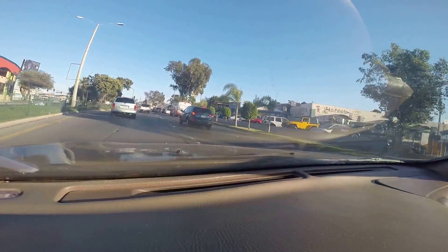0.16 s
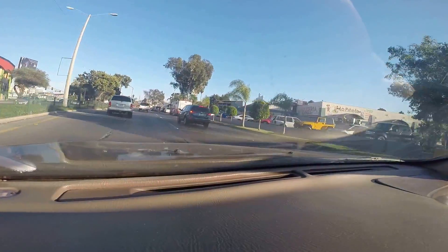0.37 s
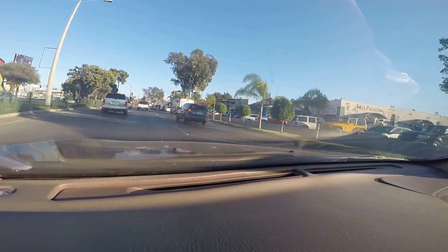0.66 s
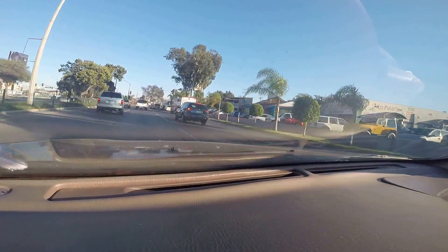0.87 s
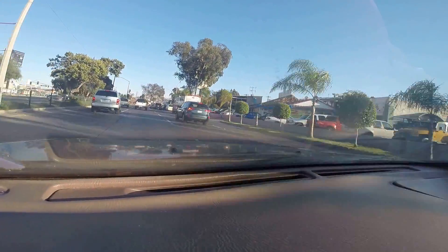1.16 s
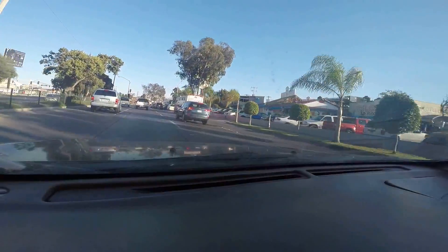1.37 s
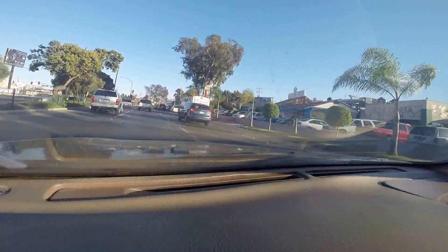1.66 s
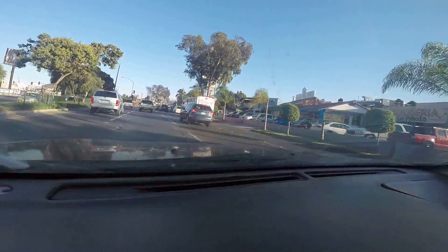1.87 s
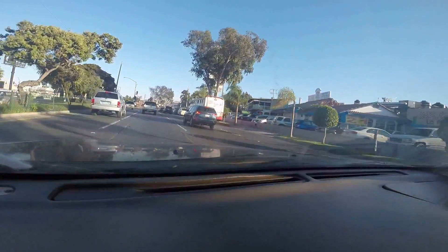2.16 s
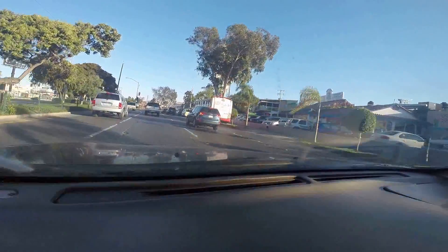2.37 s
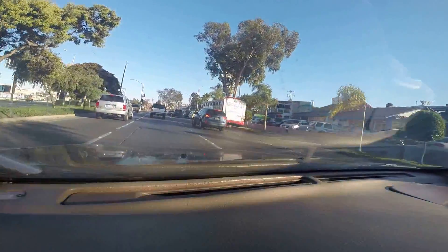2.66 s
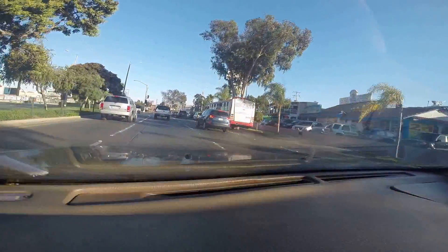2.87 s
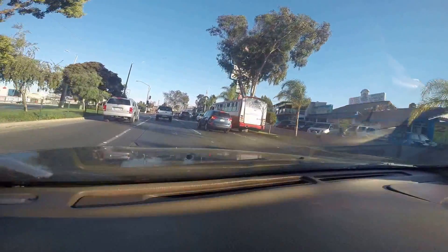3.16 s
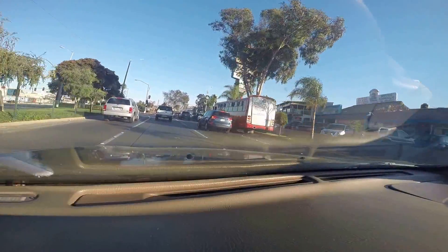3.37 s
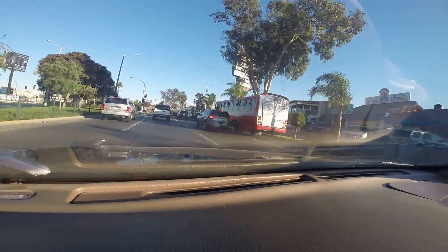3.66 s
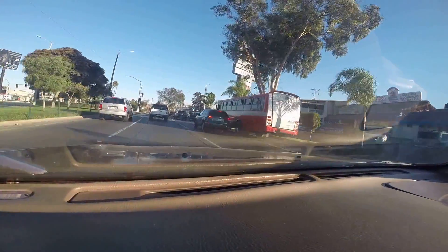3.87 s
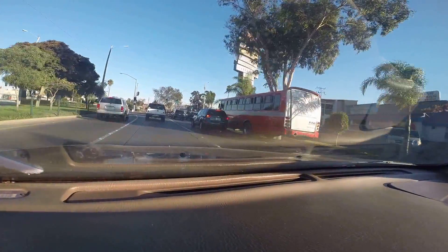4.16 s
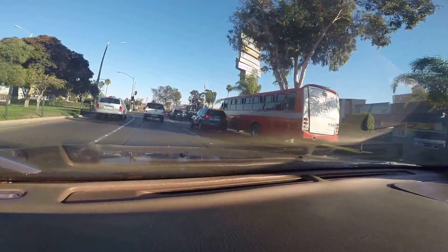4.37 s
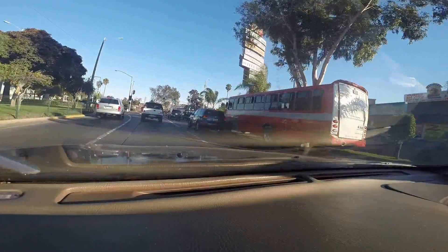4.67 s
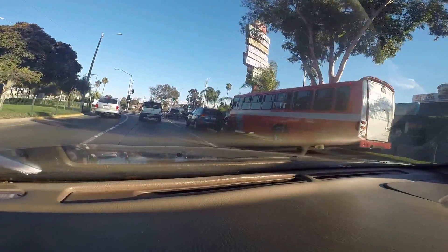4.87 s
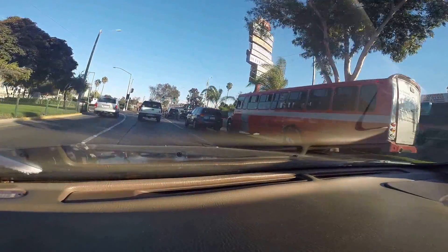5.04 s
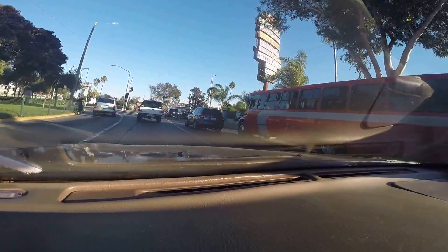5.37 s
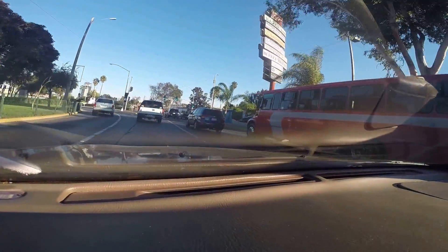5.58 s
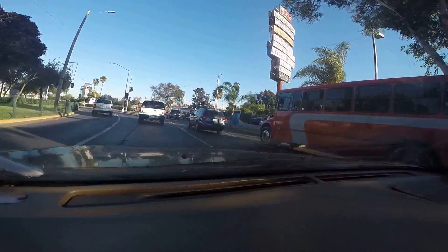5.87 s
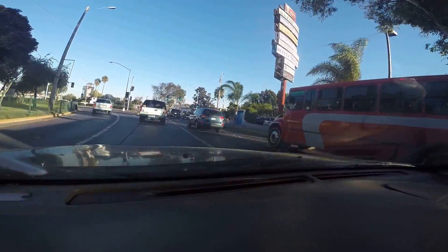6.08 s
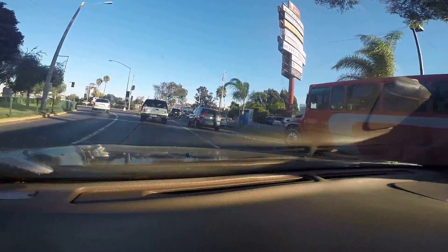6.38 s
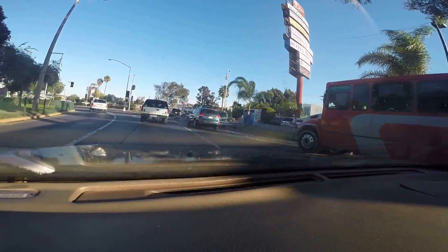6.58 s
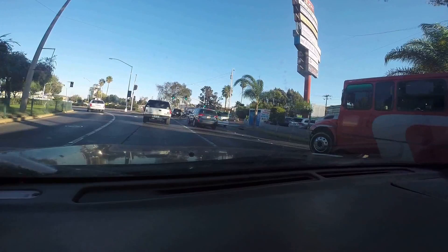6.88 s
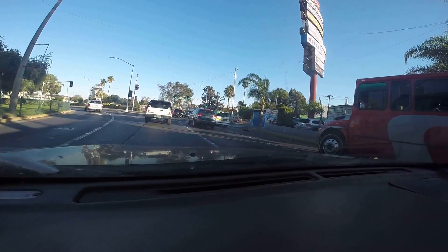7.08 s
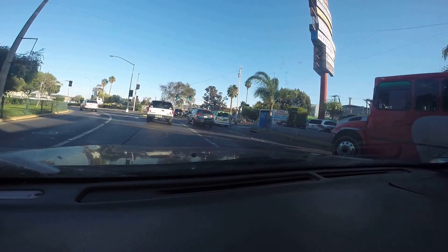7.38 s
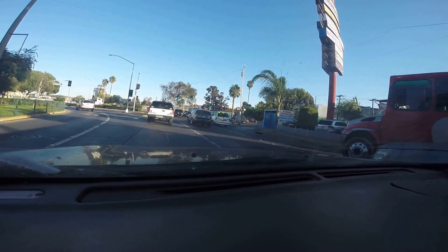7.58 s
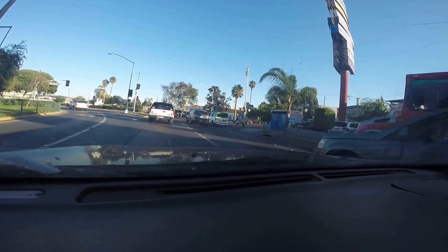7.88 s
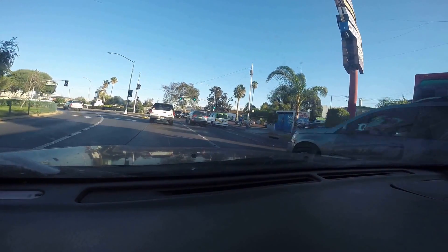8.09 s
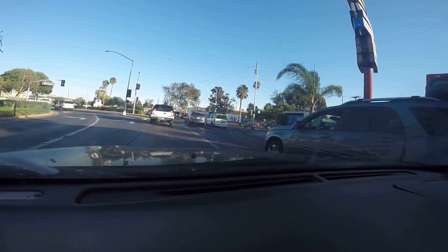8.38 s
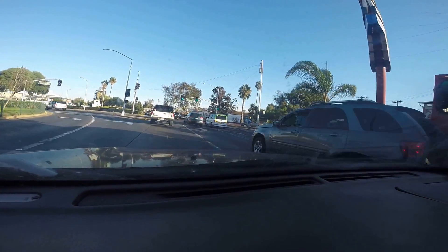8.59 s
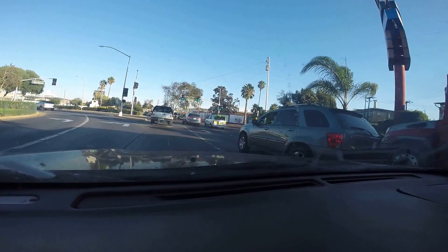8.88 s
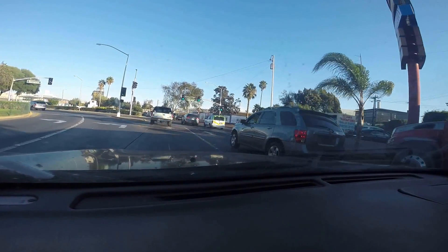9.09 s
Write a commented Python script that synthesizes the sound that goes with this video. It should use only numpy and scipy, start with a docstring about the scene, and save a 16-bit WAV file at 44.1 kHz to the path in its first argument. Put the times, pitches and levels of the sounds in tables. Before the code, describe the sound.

Low cabin rumble and thumping boom of a slowing car, with a constant crisp plastic rattle on the dashboard and traffic hiss growing at the end.

```python
"""Car slowing through city streets

Heard from a small camera in a plastic housing on the dashboard: a mount shaking near 20 Hz, cabin boom,
engine and road rumble made from wavering tones and shaped noise; ticks of a loose part and knocks of the
trim made from dying modes; low thuds and higher rasps made from short grainy noise. Behind them is hiss,
from cabin air, traffic coloured by the housing, and a vehicle alongside that grows loud towards the end."""
import sys
import numpy as np
from scipy import signal
from scipy.fft import rfft, irfft
from scipy.io import wavfile

SR = 44100
rng = np.random.default_rng(int(sys.argv[2]) if len(sys.argv) > 2 else 0)


def put_to_file(sound):
    """Save the sound as 16-bit audio at rate SR, in the file named by the first command-line argument."""
    columns = np.atleast_2d(sound).T  # one column per channel
    safe = np.clip(columns, -1, 1)
    whole_steps = np.round(safe * 32767)
    wavfile.write(sys.argv[1], SR, whole_steps.astype(np.int16))


N = 406602  # samples, about 9.22 s


def amp(db):
    """Turns dB into gain."""
    return 10 ** (np.asarray(db) / 20)


def evened(x):
    """Scales a sound to rms 1."""
    return x / np.sqrt(np.mean(x ** 2) + 1e-20)


def clock():
    """The time of every sample, in seconds."""
    return np.arange(N) / SR


def curves(rows):
    """Draws straight lines between table rows, giving each column after the time at every sample."""
    s, *columns = np.transpose(rows)
    return [np.interp(clock(), s, c) for c in columns]


def read(points, hz):
    """Reads a spectrum at any pitch, along a log-frequency axis."""
    f, value = np.transpose(points)
    return np.interp(np.log(hz + 1), np.log(f + 1), value)


def add(mix, s, sound):
    """Lays a sound into the mix at s seconds, cutting whatever falls outside."""
    at = round(s * SR)
    part = mix[max(at, 0):][:len(sound) + min(at, 0)]
    part += sound[max(-at, 0):][:len(part)]


def drift(hz):
    """Slow chance of rms 1: noise with everything faster than about hz smoothed away."""
    smoother = signal.butter(2, hz, fs=SR, output="sos")
    settled = signal.sosfilt(smoother, rng.standard_normal(N + SR))[SR:]
    return evened(settled)


def noise(spectrum, modes=()):
    """Steady noise of rms 1 with a given spectrum, lifted or cut around each resonance."""
    hz = np.fft.rfftfreq(N, 1 / SR)
    db = read(spectrum, hz)
    for f, width, lift_db in modes:
        db = db + lift_db / (1 + (2 * (hz - f) / width) ** 2)
    return evened(irfft(rfft(rng.standard_normal(N)) * amp(db), N))


def tone(hz, level_db, waver, waver_hz):
    """A low sine at an rms level, its pitch wandering by the share waver."""
    turns = np.cumsum(hz * (1 + waver * drift(waver_hz))) / SR
    return np.sqrt(2) * amp(level_db) * np.sin(2 * np.pi * (turns + rng.random()))


def resonate(x, hz, width):
    """A resonance: shifts the pitch hz down to zero, smooths, and shifts back."""
    turn = np.exp(2j * np.pi * np.cumsum(hz * np.ones(len(x))) / SR)
    r = np.exp(-np.pi * width / SR)
    smooth = signal.lfilter([1 - r], [1, -r], x / turn)
    return 2 * (turn * smooth).real


def swell(s, db, hold, rise_db, fall_db):
    """Level in dB of an event that rises to s, holds and falls, at rates in dB per second."""
    t = clock()
    return db - rise_db * np.maximum(s - t, 0) - fall_db * np.maximum(t - s - hold, 0)


def joined(levels_db):
    """Adds levels in dB as powers."""
    return 10 * np.log10(sum(amp(db) ** 2 for db in levels_db))


# jolts that set the mount swinging; start_s is when the swing becomes widest
# columns: start_s, level_db, hold_s
JOLT_TABLE = [(0.14, -28, 0.03), (0.532, -22.5, 0.034), (0.78, -27.5, 0.018), (0.993, -27, 0.058),
              (1.195, -20, 0.022), (1.525, -16.5, 0.043), (2.286, -34, 0.14), (2.618, -29, 0.17),
              (3.11, -33.5, 0.21), (3.63, -29.5, 0.027), (3.93, -26, 0.0081), (4.382, -21, 0.018),
              (5.163, -17, 0.098), (5.879, -21.5, 0.046), (6.343, -32.5, 0.018), (6.75, -30.5, 0.037),
              (7.806, -36, 0.041), (8.036, -34, 0.25), (8.6, -32, .02), (9.04, -39, 0.046)]
CALM_SHAKE_DB, CALM_FADE_DB_PER_S = -34.5, 0.2  # the mount between jolts
SHAKE_RISE_DB_PER_S, SHAKE_FALL_DB_PER_S = 139, 71


def shake_level():
    """The mount trembles less as the car slows, and swings wide at each jolt."""
    calm_db = CALM_SHAKE_DB - CALM_FADE_DB_PER_S * clock()
    jolts_db = [swell(*row, SHAKE_RISE_DB_PER_S, SHAKE_FALL_DB_PER_S) for row in JOLT_TABLE]
    return joined([calm_db] + jolts_db)


SHAKE_START_HZ, SHAKE_SAG_HZ_PER_S = 19.6, 0.08
SHAKE_LOPSIDED = 1.4  # how much harder wide swings hit on one side


def mount_shake(shake_db):
    """The mount swings as a wavering low tone; its squared part makes wide swings lopsided."""
    hz = SHAKE_START_HZ - SHAKE_SAG_HZ_PER_S * clock()
    swing = tone(hz, shake_db, 0.055, 4)
    return swing + SHAKE_LOPSIDED * (swing ** 2 - amp(shake_db) ** 2)


# cabin boom between kicks; columns: start_s, level_db
BOOM_LEVELS = [(0, -33), (.59, -23.5), (1.2, -26), (1.36, -38.5), (1.9, -34.5), (2.7, -32), (3.2, -37.5),
               (3.8, -33), (4.4, -35.5), (4.6, -43.5), (5.3, -35), (6.4, -42), (7.4, -42.5), (7.75, -38),
               (8.4, -39.5), (8.8, -36), (9.22, -36.5)]
BOOM_HZ, BOOM_START_SAG_HZ, BOOM_SETTLE_S = 62.55, 8.8, 0.303
BOOM_LOUD_DB, BOOM_FAINT_DB = -26.5, -32.5
WAVER_LOUD, WAVER_FAINT = 0.015, 0.08995  # pitch wander as a share; a faint boom wanders more


def cabin_boom():
    """The cabin hums as one low tone, starting flat and settling up to its pitch."""
    boom_db, = curves(BOOM_LEVELS)
    waver = np.interp(boom_db, (BOOM_FAINT_DB, BOOM_LOUD_DB), (WAVER_FAINT, WAVER_LOUD))
    hz = BOOM_HZ - BOOM_START_SAG_HZ * np.exp(-clock() / BOOM_SETTLE_S)
    return tone(hz, boom_db, waver, 5.515)


# kicks that ring the cabin, each at its own pitch; start_s is the loudest moment
# columns: start_s, level_db, pitch_hz
KICK_TABLE = [(0.131, -32, 51.5), (.13, -32, 33.3), (1.173, -23, 59.4), (1.176, -23.5, 42),
              (1.71, -23.5, 65.6), (1.839, -26.5, 75), (1.5, -32, 41.5), (2.9, -37, 73), (2.051, -30, 59.4),
              (2.289, -26.5, 58.8), (2.66, -30, 73), (3.129, -33, 65.3), (3.369, -33.5, 68.7),
              (3.67, -31.5, 65.8), (3.93, -26.5, 56.6), (4.16, -29.5, 75.2), (4.39, -41, 58),
              (4.74, -28, 66), (5., -30, 81.4), (4.749, -33.5, 80.5), (5.149, -29.5, 55.7),
              (5.35, -31.5, 82.7), (5.42, -30, 61.7), (5.72, -31, 82.5), (8.33, -37.5, 97), (8.35, -35, 43),
              (5.689, -27.5, 72.3), (5.873, -34, 62), (6.179, -34.5, 74.5), (6.798, -28, 74.5),
              (7.09, -31, 59.7), (7.639, -32.5, 60.4), (8.129, -32, 58.5), (8.658, -28, 62)]
KICK_RISE_DB_PER_S, KICK_FALL_DB_PER_S = 264, 139


def cabin_kicks():
    """Each kick rings the cabin air as a sine that swells and dies quickly."""
    out = np.zeros(N)
    t = np.arange(-SR // 8, SR // 3) / SR  # zero at the loudest moment
    shape_db = -KICK_RISE_DB_PER_S * np.maximum(-t, 0) - KICK_FALL_DB_PER_S * np.maximum(t, 0)
    for (s, db, hz), start in zip(KICK_TABLE, rng.random(len(KICK_TABLE))):
        kick = np.sqrt(2) * amp(db + shape_db) * np.sin(2 * np.pi * (hz * t + start))
        add(out, s + t[0], kick)
    return out


# engine firing tone, sinking as the car coasts and rising at the very end
# columns: start_s, pitch_hz, level_db
ENGINE_CURVE = [(0, 46.66, -42), (1.2, 43.41, -39), (1.8, 39.22, -39), (2.6, 33.66, -36),
                (3.6, 29.24, -33.5), (4.4, 26.48, -36), (6, 23.99, -40.5), (7.2, 22.11, -36.5),
                (8.4, 20.83, -59), (8.9, 27, -37), (9.22, 32.3, -38)]


def engine():
    """The engine's firing is one low tone that follows the pitch and level curves."""
    return tone(*curves(ENGINE_CURVE), 0.015, 3.2)


# level of each road layer; columns: start_s, body_shudder_db, tyre_drone_db, panel_drone_db
ROAD_LEVELS = [(0, -35, -43.5, -48.5), (.6, -31, -40.5, -48), (1.2, -36, -36.5, -49),
               (1.4, -38, -40, -50.5), (2, -38, -41, -49.5), (2.77, -36, -43, -49), (3.3, -35, -41.5, -49),
               (4.2, -36.5, -43, -54), (4.9, -41.5, -44.5, -53), (5.8, -33.5, -44.5, -53),
               (6.8, -35.5, -47, -55), (7.35, -41.5, -45, -56), (7.6, -36.5, -44, -55),
               (8.37, -34.5, -48, -49.5), (8.6, -38, -45, -56), (9.22, -36, -49, -53)]
# spectrum of the body shudder; columns: pitch_hz, relative_db (per Hz)
SHUDDER_SPECTRUM = [(5, -22), (9, -16), (26, -15.5), (31, -4.5), (38, 0.5), (48, -1), (66, -2.5), (86, 0),
                    (100, -10), (115, -14), (150, -55), (250, -120)]
# spectrum of the tyre drone; columns: pitch_hz, relative_db (per Hz)
TYRE_SPECTRUM = [(62, -26), (105, -1.5), (146, 2), (195, -17.5), (250, -53), (430, -120)]
# spectrum of the panel drone; columns: pitch_hz, relative_db (per Hz)
PANEL_SPECTRUM = [(110, -35), (185, -2.5), (237, -1.5), (285, 1), (381, -24), (474, -27), (571, -24),
                  (719, -23.5), (1100, -34), (1430, -63), (2420, -120)]
# how far a joint of JOINT_DB lifts shudder, tyre and panel; other joints lift more or less
JOINT_LIFT_DB, JOINT_DB, JOINT_DB_PER_DB = (8, 6, 8), -30, 0.35
JOINT_RISE_DB_PER_S, JOINT_FALL_DB_PER_S = 76, 69
ROAD_GRAIN_DB, ROAD_GRAIN_HZ = 1, 5.15  # uneven tarmac


def road():
    """The road shakes the body, drones in the tyres and hums in the panels; tarmac and joints stir each."""
    out = np.zeros(N)
    spectra = (SHUDDER_SPECTRUM, TYRE_SPECTRUM, PANEL_SPECTRUM)
    for level_db, lift_db, spectrum in zip(curves(ROAD_LEVELS), JOINT_LIFT_DB, spectra):
        lifts = []
        for s, joint_db, _, length, *_ in BUMP_TABLE:
            top_db = lift_db + JOINT_DB_PER_DB * (joint_db - JOINT_DB)
            lifts.append(swell(s, top_db, length, JOINT_RISE_DB_PER_S, JOINT_FALL_DB_PER_S))
        joints_db = np.maximum(np.max(lifts, axis=0), 0)
        grain_db = ROAD_GRAIN_DB * drift(ROAD_GRAIN_HZ)
        out += amp(level_db + joints_db + grain_db) * noise(spectrum)
    return out


# wheels crossing joints in the road; tyre_share (0-1) splits the ring between tyre and panel
# columns: start_s, level_db (before doubling), tyre_share, length_s, tyre_pitch_hz, panel_pitch_hz
BUMP_TABLE = [(0.121, -38.5, 0.55, 0.049, 121, 263), (0.441, -44.5, 0.53, 0.074, 140, 289),
              (0.622, -38, 0.56, 0.058, 220.5, 292), (0.899, -45.5, 0.22, 0.046, 140, 282),
              (1.045, -45, 0.07, 0.045, 139, 261), (1.15, -39, 0.8, 0.053, 137, 287),
              (1.46, -38, 0.34, 0.048, 137, 287), (1.672, -27.5, 0.82, 0.069, 139.4, 286),
              (2.252, -38.5, 1, 0.065, 118.3, 218), (2.52, -37, 0.89, 0.042, 132, 289),
              (3.289, -43, 1, 0.052, 123, 282), (3.96, -41.5, 0.97, 0.058, 153, 282),
              (4.689, -32, 0.77, 0.081, 149.4, 286), (6.008, -58, 0.86, 0.071, 134, 282),
              (6.19, -44.5, 0.57, 0.065, 135, 208), (8.263, -48, 0.68, 0.1, 152, 281),
              (8.628, -47.5, 0.43, 0.079, 137, 282.5), (8.92, -38.5, 0.87, 0.055, 130, 286)]


def bumps():
    """Each joint swells the tyre's air ring and a floor panel for a few cycles."""
    out = np.zeros(N)
    starts = rng.random((len(BUMP_TABLE), 2))
    for (s, db, share, length, tyre_hz, panel_hz), (a, b) in zip(BUMP_TABLE, starts):
        t = np.arange(round(length * SR)) / SR
        tyre = share * np.sin(2 * np.pi * (tyre_hz * t + a))
        panel = (1 - share) * np.sin(2 * np.pi * (panel_hz * t + b))
        add(out, s, 2 * amp(db) * (tyre + panel) * signal.windows.tukey(len(t), 0.6))
    return out


# brief moments when the low noise happens to be weaker; middle_s is the middle of the dip
# columns: middle_s, depth_db, half_length_s
DIP_TABLE = [(1.376, 2.5, 0.023), (2.172, 2, 0.028), (2.502, 4, 0.03), (3.88, 7, 0.026),
             (5.083, 11.5, 0.023), (5.73, 15, 0.021), (6.45, 4, 0.044), (6.912, 4, 0.027),
             (7.347, 3, 0.037), (7.986, 4, .03), (8.817, 2, 0.026)]


def low_dips():
    """Gain of the low sounds, easing down and back at each brief weaker moment."""
    dip_db = np.zeros(N)
    for s, depth_db, half in DIP_TABLE:
        add(dip_db, s - half, depth_db * signal.windows.tukey(round(2 * half * SR), 0.7))
    return amp(-dip_db)


# loose part tapping the housing; middle_s is the middle of the contact
# columns: middle_s, level_db (before modes and gain), dullness_db (per octave)
TICK_TABLE = [(0.1314, -34, 1.0), (0.312, -35.0, 0.5), (0.3589, -34.5, 1), (0.3646, -36, 0),
              (0.4128, -36, 0.5), (0.4619, -33, 1), (0.4667, -36, -2), (0.5653, -35, 1.0),
              (0.5854, -47.0, -4.0), (0.6164, -38, 0.5), (0.695, -35, 0), (0.8446, -35.5, 0),
              (0.897, -38, 0.5), (0.9466, -41, 2), (1.09, -36.0, 1.0), (1.1407, -37, 1), (1.2295, -34, 0),
              (1.2369, -35.5, 0), (1.2855, -33.5, 2), (1.2885, -32.0, -2), (1.3454, -33.5, -0.5),
              (1.4423, -36, 0), (1.5026, -37.5, 0.5), (1.5564, -35, 1.0), (1.7117, -33.5, 0.5),
              (1.7218, -34, -0.5), (1.7808, -36.5, 1), (1.8511, -43, 2), (1.8863, -40, 2.0),
              (1.988, -34.0, 0.5), (1.9922, -34, 0.5), (2.0428, -31, -1), (2.045, -32.5, 0),
              (2.0981, -30.5, -0.5), (2.1003, -32, -3), (2.155, -32.0, -0.5), (2.1579, -37.5, -1),
              (2.2148, -36.0, 0.0), (2.275, -38, 3.5), (2.2813, -32.5, -2), (2.376, -37, 1.0),
              (2.4243, -36.5, 0.5), (2.5046, -48, 2), (2.5507, -38.0, -1.0), (2.564, -34.5, -3),
              (2.6217, -36.5, 0.0), (2.6723, -37.5, 0.5), (2.6823, -35.0, -2.0), (2.7238, -37, 2.5),
              (2.7353, -32.5, -3), (2.7934, -36, 1), (2.8489, -36.5, 1.5), (2.861, -34.5, -3.5),
              (2.9045, -39, -0.5), (2.966, -37, 1.5), (3.02, -35.5, 1), (3.097, -41.5, 0.0),
              (3.1442, -36.0, 2.5), (3.149, -33.5, -0.5), (3.1967, -34, 1), (3.2015, -34, -0.5),
              (3.255, -35, 0.5), (3.2645, -34.5, 0), (3.3119, -38, -2), (3.499, -43, 1),
              (3.6284, -37.5, -3.5), (3.6403, -35, -1.5), (3.6885, -32, 1), (3.6917, -31.5, -1),
              (3.7466, -32.5, -0.5), (3.752, -36, -2), (3.7992, -37, 0.5), (3.855, -37.5, 0.5),
              (3.9751, -38.5, 1.5), (4.0528, -38.0, 0.0), (4.1151, -35, 1.0), (4.1751, -35, -1),
              (4.224, -35.5, 0), (4.323, -37, 0.5), (4.4754, -37.5, -1.5), (4.5244, -36, 1),
              (4.6716, -35, 0.0), (4.7565, -34, 0.5), (4.7649, -37, -2), (4.816, -32, 0.5),
              (4.82, -35.0, -0.5), (4.8873, -37.5, 0.5), (4.963, -46, 3), (5.0895, -36.0, 0.0),
              (5.1475, -32, 1.5), (5.1501, -32, -0.5), (5.2019, -31.5, 0.5), (5.207, -35.5, -1),
              (5.2528, -31.5, 0.5), (5.256, -31.5, -4.0), (5.3115, -34.5, 1.5), (5.3153, -33.5, -0.5),
              (5.3694, -36.5, 1.5), (5.4282, -35, 2), (5.4879, -36.5, 0), (5.549, -36.5, 0),
              (5.6851, -37.5, 1), (5.8013, -38.5, 0.5), (5.9543, -36, 0), (6.009, -33.5, 0.5),
              (6.0158, -38, -2), (6.0701, -38.5, 1.5), (6.1652, -35.5, 1), (6.2169, -35.0, 0.5),
              (6.219, -43.5, -1), (6.2248, -35.5, -2), (6.2764, -37, 0.0), (6.34, -37, 0.5),
              (6.3854, -34.5, 0.5), (6.4409, -38.5, -1.0), (6.543, -34, 0), (6.5527, -37, -2),
              (6.7104, -37, 1), (6.76, -37.0, -6), (6.9158, -38, 0.5), (7.2389, -38.5, 1),
              (7.3591, -38.5, -0.5), (7.5309, -39, 0.5), (7.5774, -37, 1.5), (7.7522, -36.5, -0.5),
              (7.8666, -36.0, -2), (7.9289, -41, 2), (8.3369, -36.5, -2.5), (8.4124, -37.5, -4.0),
              (8.5367, -37, -8), (8.8038, -41.0, 2.5), (8.9559, -36.5, -2), (9.0006, -33, -2.5),
              (9.066, -38, -1), (9.1226, -38, 0), (9.1315, -37, -2), (9.1881, -37, -3)]
# what the tap rings; columns: pitch_hz, relative_db, time_to_fall_60_db_s
TICK_RINGS = [(1410, -19.5, 0.022), (1607, -9, 0.014), (2386, -8.5, 0.013), (2900, -12.5, 0.0085),
              (3360, -23, 0.0036), (4150, -13, 0.011), (4490, -17.5, 0.011), (4816, -10, 0.01),
              (5700, -18.5, 0.012), (6100, -16.5, .01), (6650, -24, 0.0081), (7450, -25.5, 0.016),
              (8370, -7.5, 0.0085), (9000, -23.5, .009), (9180, -24, 0.0085), (9680, -22.5, .009),
              (10200, -16, 0.007), (10800, -20.5, 0.0088), (11400, -24.5, .007), (12240, -23, 0.0065),
              (12950, -26, .006), (13700, -27, 0.0045)]
TICK_CONTACT_S, TICK_GAIN_DB = 0.001, 1.5
TICK_VARY_DB, TICK_DETUNE = 1, 0.0062  # chance in each mode's level and pitch (a share)
TICK_LAG_RAD = 0.35  # how far modes start out of step


def ticks():
    """Nearly the same tap each time: modes ring after a short contact, and a dull tap favours low ones."""
    hz, mode_db, t60 = np.transpose(TICK_RINGS)[:, :, None]
    t = np.arange(700) / SR
    sign = (-1.) ** np.arange(len(hz))[:, None]  # neighbouring modes push opposite ways
    onset = np.sin(np.pi / 2 * np.minimum(t / TICK_CONTACT_S, 1)) ** 2
    out = np.zeros(N)
    chance = rng.standard_normal((len(TICK_TABLE), 3, len(hz), 1))
    for (s, db, dull_db), (vary, detune, lag) in zip(TICK_TABLE, chance):
        tilt_db = dull_db * np.log2(8400 / hz)  # no tilt at 8400 Hz
        rings = amp(db + mode_db + tilt_db + TICK_VARY_DB * vary - 60 * t / t60)
        pitch = hz * (1 + TICK_DETUNE * detune)
        tap = sign * rings * np.sin(2 * np.pi * pitch * t + TICK_LAG_RAD * lag)
        add(out, s - TICK_CONTACT_S / 2, onset * tap.sum(0))
    return amp(TICK_GAIN_DB) * out


def ring(hz, t60, rise_cycles, size=1600):
    """One mode dying away; it takes a few cycles to build, so low modes come in late."""
    t = np.arange(size) / SR
    build = (1 - np.exp(-t * hz / rise_cycles)) ** 2
    return amp(-60 * t / t60) * build * np.sin(2 * np.pi * hz * t)


# what the trim rings; columns: pitch_hz, relative_db
TRIM_RINGS = [(520, -6), (720, 23), (950, 13.5), (1340, 11.5), (1580, 11), (1900, -4), (2360, 7.5),
              (2750, 2), (3150, 1), (3600, -1.5), (3950, -2), (4300, -0.5), (6000, -9.5), (6500, -4.5),
              (7300, -13)]


def knock(hz, narrow_db, t60, detune):
    """A blow rings the trim modes, favouring those near hz; its peak is 1."""
    blow = 0
    for (f, db), d in zip(TRIM_RINGS, detune):
        near_db = db - narrow_db * abs(np.log2(f / hz))
        blow = blow + amp(near_db) * ring(f * d, t60, 4.3)
    return blow / abs(blow).max()


# dull knocks of the trim, some built from several rows at different pitches
# columns: start_s, level_db, favoured_pitch_hz, narrowness_db (per octave), time_to_fall_60_db_s
KNOCK_TABLE = [(.4, -45, 1360, 25, 0.012), (0.4654, -42, 1590, 23, .013), (.514, -50, 2300, 12, .008),
               (.64, -51, 1800, 10, .008), (.724, -46, 1600, 12, .01), (1.036, -50, 1320, 30, .013),
               (1.0689, -49, 1310, 25, .013), (1.1769, -47, 1440, 25, .013), (1.433, -44.5, 780, 20, .014),
               (1.435, -36, 1750, 20, 0.011), (1.448, -38, 1370, 11, .014), (1.4505, -46, 2350, 28, .022),
               (1.4555, -44, 1500, 25, .014), (1.488, -48, 1750, 25, .014), (1.478, -54, 1600, 7, .012),
               (1.471, -49, 2400, 30, .016), (1.507, -43, 2500, 20, 0.0087), (1.509, -32, 1600, 33, 0.0071),
               (1.508, -38, 775, 25, 0.0091), (1.525, -36, 2570, 17, 0.01), (1.559, -38, 1910, 22, .011),
               (1.579, -36.5, 2560, 20, 0.01), (1.587, -48, 720, 20, 0.011), (1.588, -44, 1500, 16, 0.0074),
               (1.608, -54, 4130, 23, .01), (1.6292, -45, 2100, 17, .008), (1.6386, -42, 1344, 27, .014),
               (1.6455, -46, 900, 12, .012), (1.727, -45, 2400, 14, .008), (1.9645, -37, 1580, 30, 0.0087),
               (1.9632, -34.5, 2850, 24, 0.011), (2.5378, -46, 950, 22, .013),
               (2.5397, -41, 1610, 19, .012), (2.547, -41, 1480, 24, 0.015), (2.542, -48, 2350, 25, .016),
               (2.5548, -53, 1400, 25, .01), (2.5874, -50, 1670, 22, .013), (2.6407, -43, 1530, 17.5, .013),
               (3.2795, -36.5, 2700, 14, 0.0096), (3.282, -37, 1620, 26, .009),
               (3.2915, -43, 2900, 22, .007), (3.2925, -39, 1600, 28, .008), (3.284, -47, 2300, 30, .011),
               (3.298, -49, 1450, 30, .011), (3.3399, -47.5, 1471, 20, 0.0072),
               (3.672, -47, 1570, 22, 0.015), (3.991, -45.5, 1490, 25, .013), (4.3148, -44, 1598, 18, .013),
               (4.3466, -47, 1310, 35, .018), (4.682, -45, 4130, 15, .007), (4.683, -34.5, 1500, 38, 0.012),
               (4.6822, -44, 2700, 20, .008), (4.6883, -44, 1500, 30, .011), (4.6927, -44, 1490, 35, 0.016),
               (4.73, -46, 6500, 14, .007), (4.737, -45, 1522, 30, .016), (4.745, -46, 1560, 28, .01),
               (4.9177, -41.5, 1330, 32, 0.012), (5.012, -49, 2900, 35, .016),
               (5.027, -45, 1100, 12, 0.018), (5.0934, -44, 1400, 18, 0.011), (5.1275, -47, 2000, 10, .008),
               (5.149, -30.5, 1810, 33, 0.013), (5.1544, -41, 1400, 17, 0.014),
               (5.1545, -40, 880, 25, 0.011), (5.156, -44, 2500, 15, .008), (5.161, -47, 1400, 25, .012),
               (5.167, -50, 1490, 20, 0.011), (5.175, -43, 2400, 18, .007), (5.181, -49, 2500, 12, .008),
               (5.184, -32, 1490, 45, .014), (5.211, -48, 1800, 14, .008), (5.2295, -40, 1700, 11, .009),
               (5.238, -50, 2500, 14, .008), (5.278, -40, 1900, 12, 0.0095), (5.287, -48, 2890, 12, .007),
               (5.467, -51, 1500, 11.5, .01), (5.4757, -36.5, 3970, 47, 0.012), (5.48, -43, 3950, 28, .016),
               (5.8007, -43, 1798, 18, 0.0078), (5.876, -43, 3200, 18, .012), (5.9003, -39, 4100, 13, .008),
               (5.941, -40, 2300, 22, .011), (6.4921, -52, 1720, 22.5, .013),
               (6.6304, -45, 1691, 23, 0.012), (7.51, -45.5, 4100, 25, .016), (7.842, -45, 1614, 22, .013),
               (7.84, -48, 3900, 25, .016), (7.854, -40.5, 4300, 14, .012), (7.888, -47, 1400, 29, .014),
               (9.0005, -41, 2900, 25, 0.0073), (9.011, -35, 4700, 18, .012), (9.021, -42, 3600, 18, .012)]


def trim_knocks():
    """Knocks of the trim, some built from several rows; each row's modes are slightly detuned."""
    out = np.zeros(N)
    detune = 1 + 0.018 * rng.standard_normal((len(KNOCK_TABLE), len(TRIM_RINGS)))
    for (s, db, *blow), d in zip(KNOCK_TABLE, detune):
        add(out, s, amp(db) * knock(*blow, d))
    return out


RATTLE_FAINTEST_DB = -64.5  # the faintest rattle at average shake
RATTLES_PER_S = 60  # for each of the four pitches


def trim_rattles(shake_db):
    """Faint blows at random moments, louder when the mount shakes more."""
    out = np.zeros(N)
    follow_db = 0.5 * (shake_db - shake_db.mean())
    chance_db = 2.7 * np.minimum(rng.exponential(1, N), 3)
    size = amp(RATTLE_FAINTEST_DB + follow_db + chance_db)
    for hz in (700, 1500, 2400, 2960):
        blows = size * (rng.random(N) < RATTLES_PER_S / SR)
        out += signal.oaconvolve(blows, knock(hz, 15, 0.0041, np.ones(len(TRIM_RINGS))))[:N]
    return out


# short noise bursts: low thud bodies of knocks, and higher rasps
# columns: start_s, level_db, centre_pitch_hz, width_hz (of each of three resonances), length_s
BURST_TABLE = [(0.4, -51.5, 570, 780, 0.02), (0.583, -56, 3500, 6000, 0.016), (0.637, -55, 636, 650, 0.029),
               (1.195, -55, 610, 700, 0.026), (1.463, -49, 620, 500, 0.024), (1.45, -60, 1900, 2200, .04),
               (4.313, -55, 670, 800, 0.022), (5.79, -53, 750, 800, 0.0094),
               (3.28, -49.5, 790, 1000, 0.011), (4.679, -54.5, 2600, 2500, 0.012),
               (4.678, -50, 590, 730, 0.018), (2, -58, 3500, 5000, .006), (5.9, -59, 4200, 4000, 0.053),
               (5.15, -55, 2100, 1800, 0.018), (5.796, -59, 2500, 2000, .014),
               (9.146, -57.5, 5000, 6000, .01), (5.471, -59, 5800, 5014, .012),
               (5.87, -56.5, 6830, 2200, 0.018), (5.894, -52.5, 6800, 3600, 0.016),
               (5.91, -62, 5000, 5400, 0.05), (5.944, -54, 3500, 1500, .01),
               (7.845, -56, 4520, 3022, 0.0099), (8.9, -52, 5470, 4300, 0.014)]


def thuds_and_rasps():
    """Short grainy bursts: cubed noise through three equal resonances, low for thuds, higher for rasps."""
    out = np.zeros(N)
    grit = rng.standard_normal((len(BURST_TABLE), 4000)) ** 3
    for (s, db, hz, width, length), g in zip(BURST_TABLE, grit):
        size = round(length * SR)
        burst = g[:size]
        for _ in range(3):
            burst = resonate(burst, hz, width)
        add(out, s, amp(db) * evened(burst) * signal.windows.tukey(size, 0.5))
    return out


# spectrum of the vehicle alongside; columns: pitch_hz, relative_db (per Hz)
ALONGSIDE_SPECTRUM = [(1500, -15.5), (2500, 1), (3000, -2.5), (3700, -0.5), (4500, -4.5), (7000, -14.5),
                      (14000, -46)]
# whines of that vehicle; columns: pitch_hz, width_hz, level_db (over its hiss at its loudest)
WHINE_TABLE = [(1734, 58, -15), (3020, 20, -19), (3665, 110, -8.5), (7220, 81, -24), (4260, 90, -21),
               (3470, 25, -22), (3580, 34, -11.5)]
# a hissing band of that vehicle; columns: start_s, pitch_hz, level_db
HISS_BAND = [(6.4, 6000, -84), (6.7, 5900, -78), (6.9, 5950, -78), (7.03, 6500, -69), (7.13, 6000, -78),
             (7.24, 6200, -68), (7.4, 6550, -72), (7.53, 6200, -69.5), (7.7, 6400, -88),
             (8.05, 6600, -76.5), (8.18, 6700, -71), (8.35, 6300, -68), (8.52, 6200, -72),
             (8.64, 5800, -77), (8.7, 5700, -81), (8.8, 5800, -70), (9, 6100, -75), (9.22, 6200, -76)]
# its breathy whistle; columns: start_s, pitch_hz, level_db
WHISTLE_CURVE = [(6.4, 2890, -70), (7.27, 2970, -69), (7.97, 2940, -82.5), (8.52, 2990, -79),
                 (8.64, 2970, -63), (8.8, 2940, -57), (9, 2920, -59.5), (9.22, 2960, -54)]
WHINE_DB_PER_DB = 0.64  # extra rise of the whines for each dB of hiss


def vehicle_alongside():
    """A vehicle hisses, whines and whistles; its whines grow faster than its hiss as it nears."""
    _, level_db = curves(PASSING_LEVELS)
    white = rng.standard_normal(N)
    whines = sum(amp(db) * evened(resonate(white, hz, width)) for hz, width, db in WHINE_TABLE)
    whine_gain = amp(WHINE_DB_PER_DB * (level_db - level_db.max()))
    body = amp(level_db) * (noise(ALONGSIDE_SPECTRUM, HOUSING_MODES) + whine_gain * whines)
    whistle = amp(1.4 * drift(12)) * band(white, WHISTLE_CURVE, 160)
    return body + band(white, HISS_BAND, 580) + whistle


def band(white, rows, width):
    """Noise in a narrow band that follows a curve and fades in over the second before it."""
    hz, level_db = curves(rows)
    arrival = np.clip(clock() - rows[0][0] + 1, 0, 1)
    return amp(level_db) * arrival * evened(resonate(resonate(white, hz, width), hz, width))


# vehicles outside; columns: start_s, traffic_drone_db, alongside_hiss_db
PASSING_LEVELS = [(0, -64, -62.5), (.36, -66.5, -64.5), (2.3, -65.5, -65), (4.6, -64, -63.5),
                  (5.3, -62, -63.5), (5.7, -61, -63.5), (6.15, -57.5, -61.5), (6.44, -58.5, -62),
                  (6.83, -57, -59.5), (7.16, -54.5, -58), (7.45, -60, -58.5), (8.01, -54.5, -58.5),
                  (8.4, -57.5, -56), (8.73, -57.5, -54.5), (9.04, -54, -51.5), (9.22, -51, -50.5)]
# spectrum of the traffic; columns: pitch_hz, relative_db (per Hz)
TRAFFIC_SPECTRUM = [(600, -9.5), (1200, -10), (1700, -4.5), (2400, -13), (3000, -23), (5000, -41)]
# housing resonances that colour traffic and the vehicle alongside; columns: pitch_hz, width_hz, lift_db
HOUSING_MODES = [(1717, 270, 7.5), (2070, 120, -7), (2225, 250, 6), (2957, 170, 7), (3290, 190, -5),
                 (3430, 130, 6), (3640, 200, 3), (4390, 140, 4), (4550, 200, -6), (4890, 180, 5),
                 (5300, 300, -0.5), (5970, 250, 4), (6480, 430, 4), (7140, 150, -6), (7170, 160, 2)]


def traffic():
    """Traffic is noise coloured by the housing, its level fluttering slightly."""
    level_db, _ = curves(PASSING_LEVELS)
    return amp(level_db + 0.89 * drift(5.2)) * noise(TRAFFIC_SPECTRUM, HOUSING_MODES)


# spectrum of the cabin air; columns: pitch_hz, relative_db (per Hz)
CABIN_SPECTRUM = [(190, -50), (330, -1), (493, -5), (1190, -9.5), (1620, -8), (2000, -14), (2380, -22.5),
                  (3240, -38), (4840, -22.5), (7120, -27.5), (8360, -26), (9210, -28), (10500, -29.5),
                  (12500, -35), (15400, -45)]


def cabin_air():
    """The air in the cabin is faint steady noise that drifts a little around -59 dB."""
    return amp(-59 + 0.5 * drift(2.8)) * noise(CABIN_SPECTRUM)


def scene():
    """Adds every source at one microphone; only the low sounds take the brief dips."""
    shake_db = shake_level()
    lows = mount_shake(shake_db) + cabin_boom() + cabin_kicks() + engine() + road() + bumps()
    taps_and_bursts = ticks() + trim_knocks() + trim_rattles(shake_db) + thuds_and_rasps()
    hiss = vehicle_alongside() + traffic() + cabin_air()
    return (lows * low_dips() + taps_and_bursts + hiss)[None]


EDGE_HZ, FADE_S = 15550, 0.012


def record(dry):
    """Removes the treble above EDGE_HZ and fades the last instant."""
    taps = signal.firwin(1023, EDGE_HZ, window=("kaiser", 9), fs=SR)[None]
    time_left = np.arange(N)[::-1] / SR
    fade = np.sin(np.pi / 2 * np.minimum(time_left / FADE_S, 1))
    padded = np.pad(dry * fade, ((0, 0), (511, 511)), "reflect")
    return signal.oaconvolve(padded, taps, "valid")


dry = scene()
out = record(dry)
put_to_file(out)
```